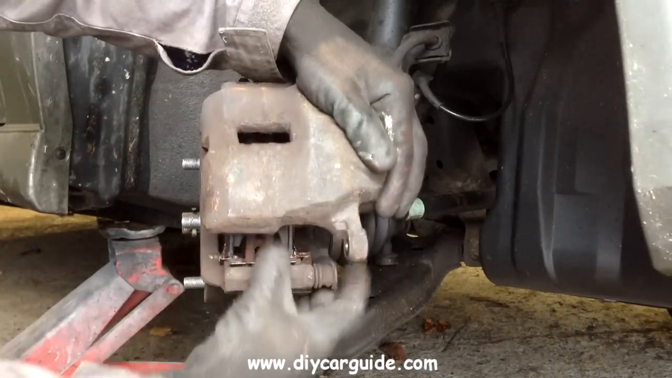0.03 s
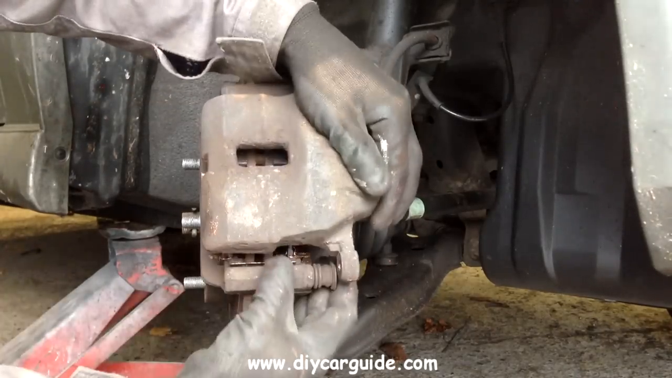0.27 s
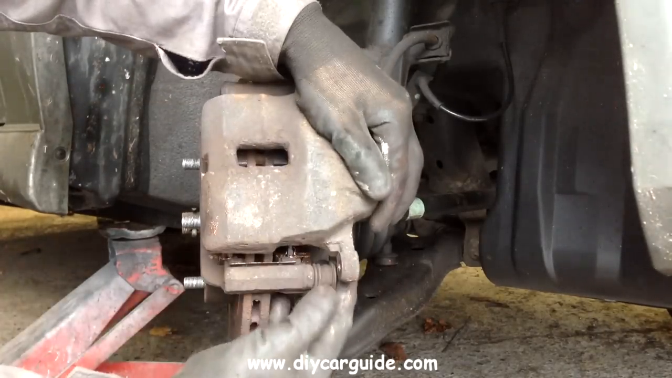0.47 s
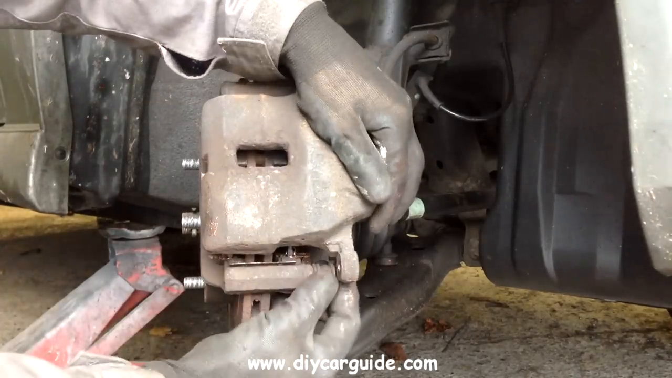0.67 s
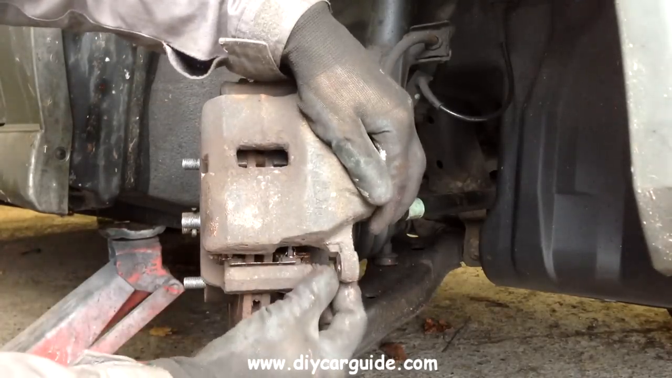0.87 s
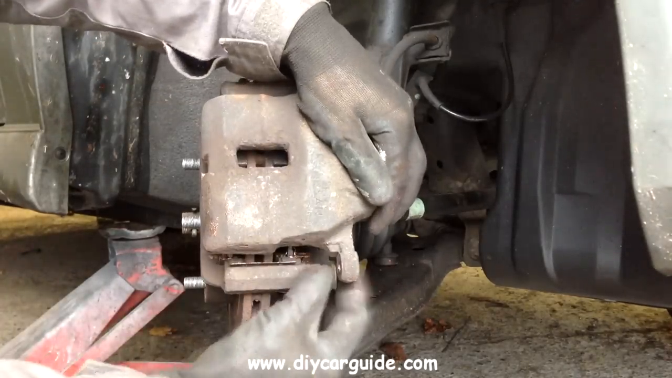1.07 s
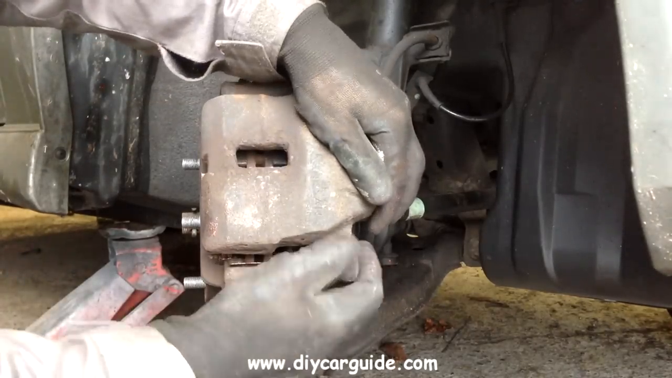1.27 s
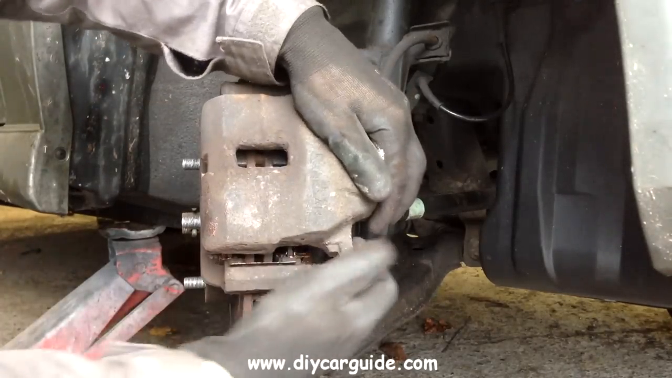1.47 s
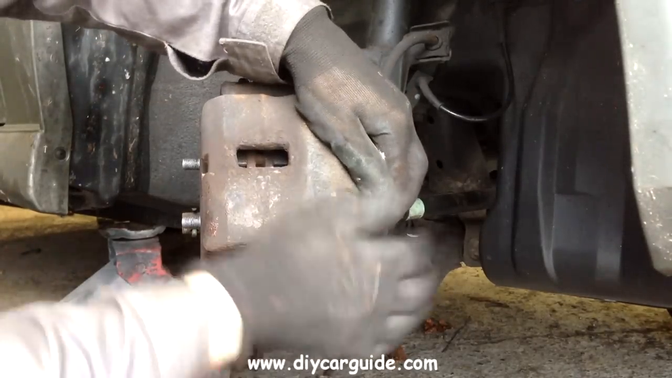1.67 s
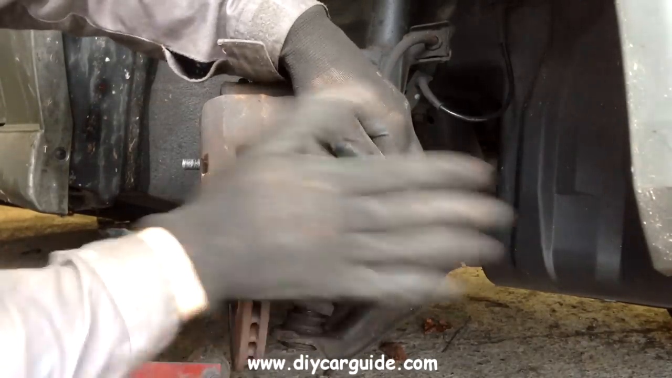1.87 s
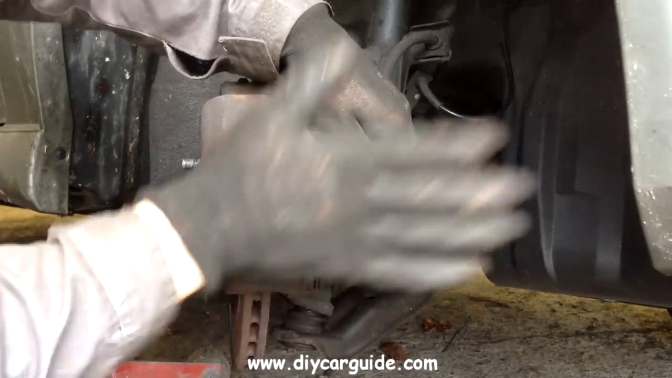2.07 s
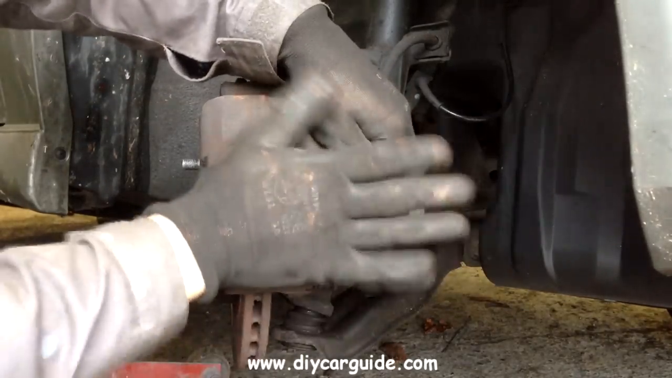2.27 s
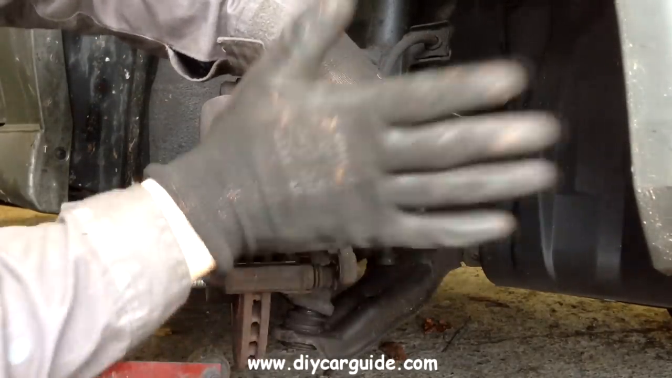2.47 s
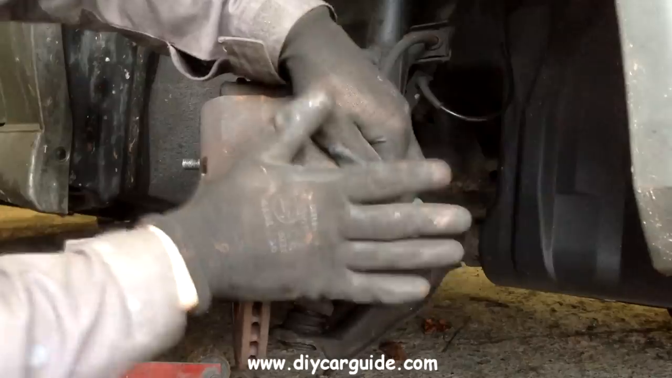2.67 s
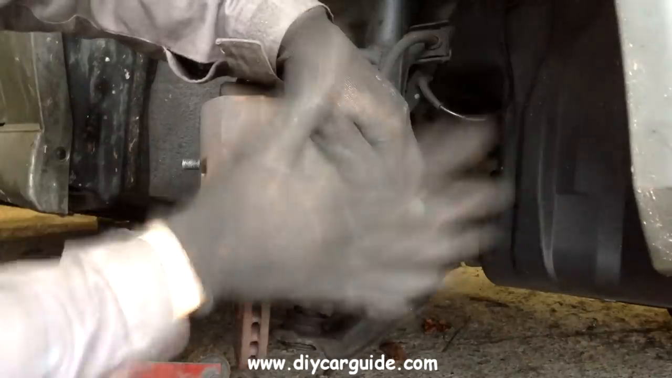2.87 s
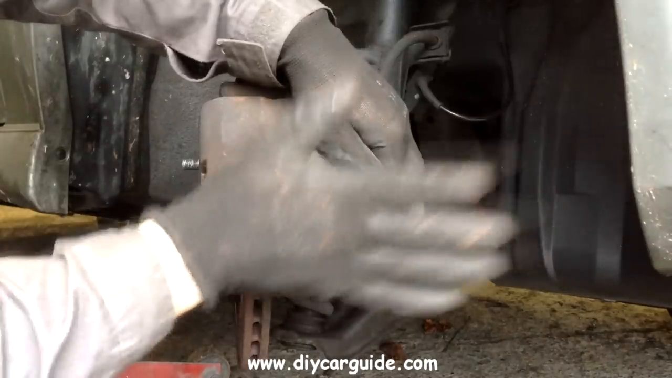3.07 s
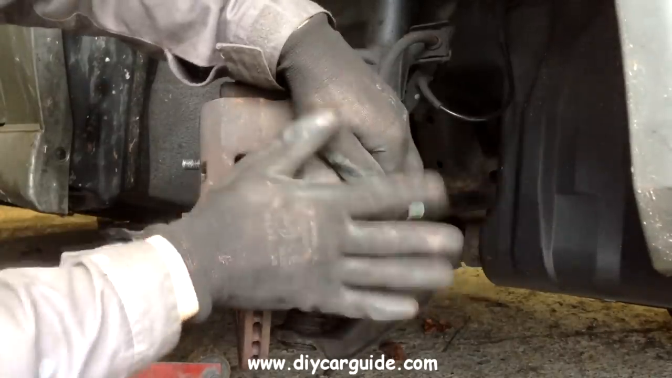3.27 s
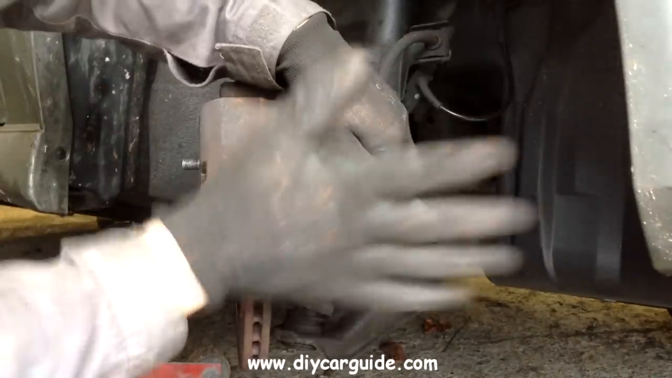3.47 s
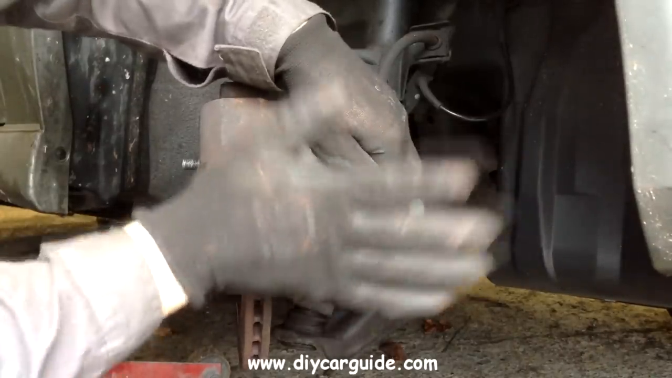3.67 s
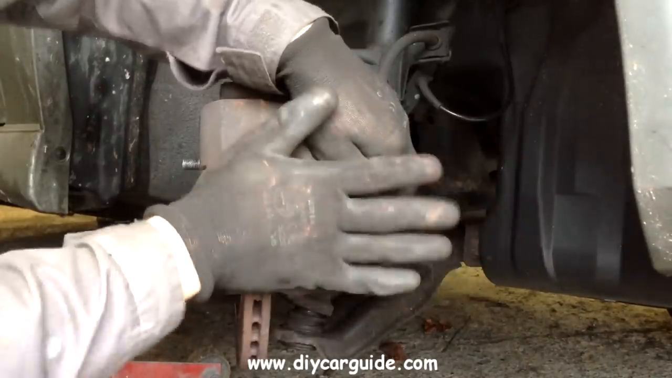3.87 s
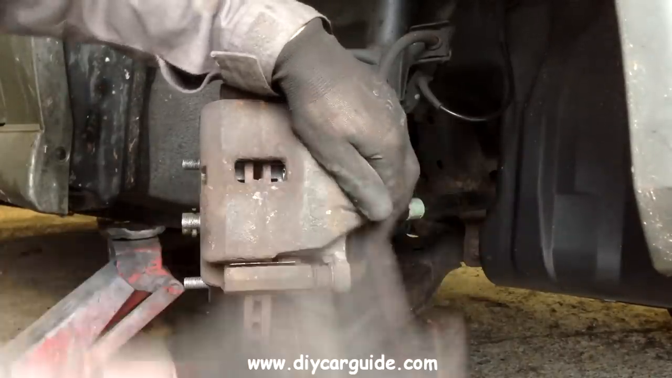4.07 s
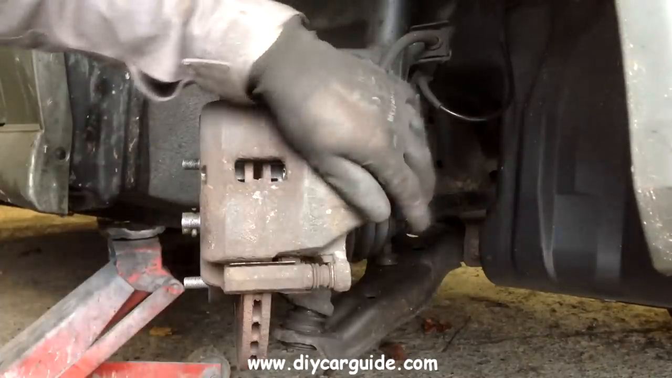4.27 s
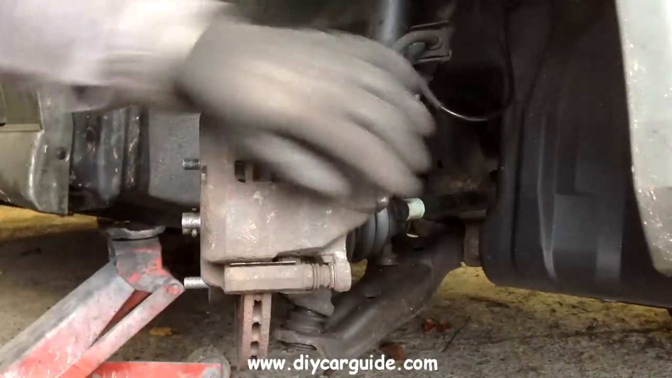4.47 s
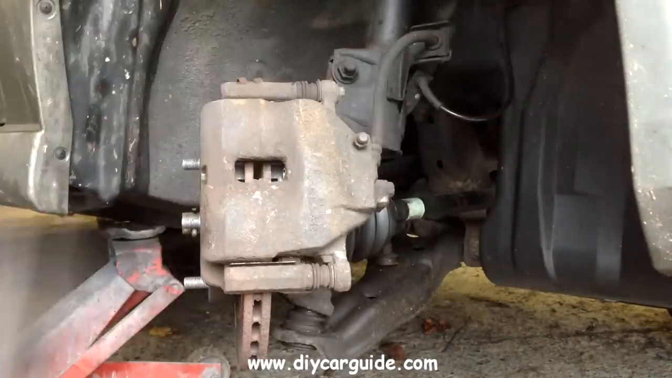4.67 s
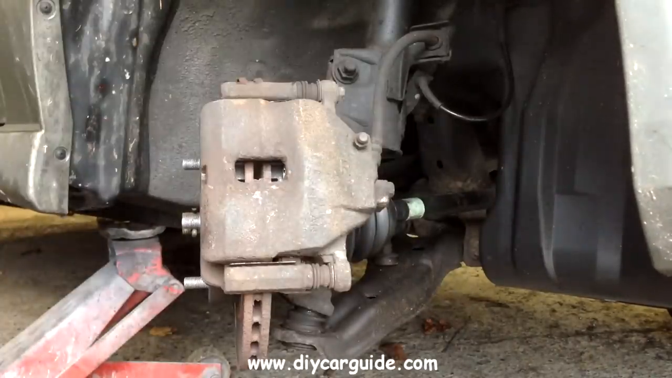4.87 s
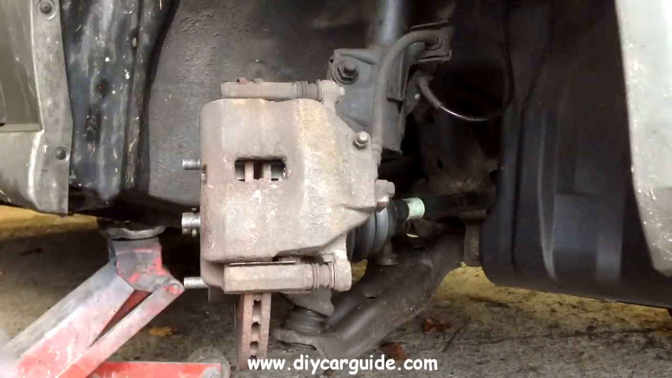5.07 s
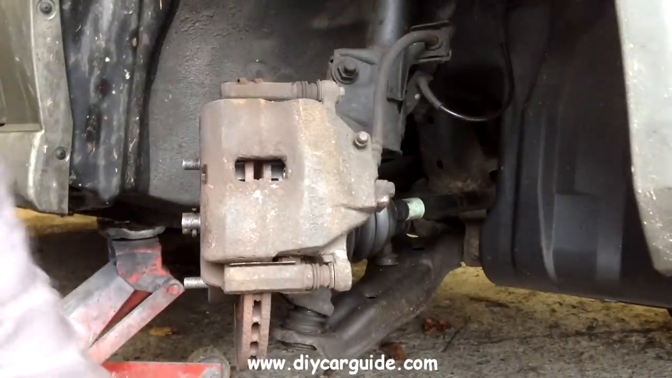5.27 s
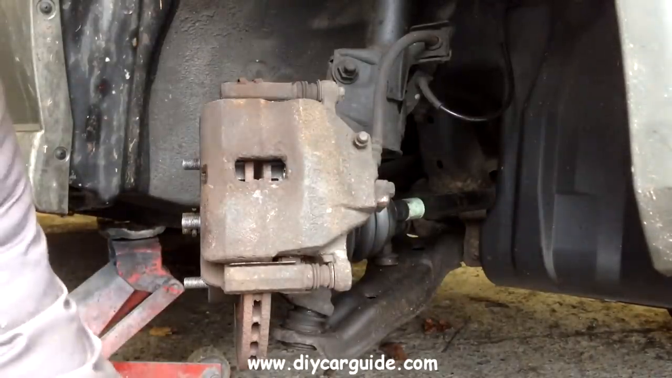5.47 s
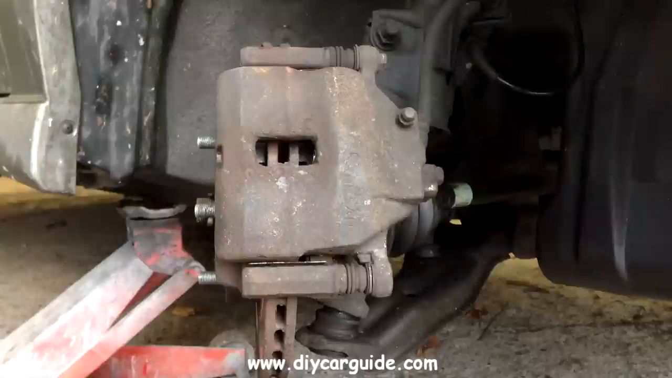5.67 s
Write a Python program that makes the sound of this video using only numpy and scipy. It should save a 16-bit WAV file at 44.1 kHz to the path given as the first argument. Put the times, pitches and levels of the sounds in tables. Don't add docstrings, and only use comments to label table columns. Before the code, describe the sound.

Over constant deep mains hum and soft hiss, a cast-iron part is slapped into place with seven hard, dull-ringing clacks.

```python
import sys
import numpy as np
from scipy import signal
from scipy.fft import rfft, irfft
from scipy.io import wavfile
from scipy.ndimage import uniform_filter1d

SR = 44100
rng = np.random.default_rng(int(sys.argv[2]) if len(sys.argv) > 2 else 0)


def bounce(signal):
    frames = np.transpose(np.atleast_2d(signal))
    limited = np.clip(frames, -1, 1)
    pcm = np.round(limited * 32767).astype(np.int16)
    wavfile.write(sys.argv[1], SR, pcm)


def invert_db(x):
    u = np.asarray(x, float) / 20
    return 10 ** u


N = 253134
LENGTH = 32768

# first touch t/s, tail level/dB, suspension thump level/dB, thump f/Hz
BLOWS = [
    (1.9774, -12, -29.5, 146),
    (2.315, -16.5, -19.5, 149),
    (2.657, -19, -18, 177),
    (2.959, -17, -20, 165),
    (3.288, -15, -25.5, 150),
    (3.5794, -17.5, -25.5, 142),
    (3.857, -12.5, -28.5, 167),
]
# level/dB, favoured f/Hz, free time before muting t/s
CASTING_RINGS = [
    (-40, 430, 0.102),
    (-34, 420, .15),
    (-30, 530, 0.2),
    (-28, 630, 0.11),
    (-24, 700, 0.18),
    (-28.5, 680, 0.12),
    (-25, 980, 0.27),
]
# level/dB, loosest spring f/Hz
PAD_SPRINGS = [
    (-50, 2900),
    (-46, 3400),
    (-35, 3340),
    (-27, 3340),
    (-42, 4100),
    (-40, 2320),
    (-30, 2600),
]
# f/Hz, t60/s
MODES = [(420, 0.41), (565, 0.27), (765, 0.29), (880, 0.089), (1160, 0.1), (1450, 0.15), (2320, .2),
         (2635, 0.39), (3340, 0.42), (4000, 0.094)]
# t/s, level/dB, centre f/Hz, fall/ms
SCRAPES = [(1.976, -34.5, 3000, 12.5), (2.315, -27, 3000, 7), (2.318, -22, 5260, 7.3),
           (2.6587, -21, 4200, 2.2), (2.6613, -15.5, 2550, 6.8), (2.674, -27, 2800, 6.4),
           (2.961, -17, 3000, 11), (2.973, -14.5, 1900, 6.2), (3.299, -29, 2720, 7.2),
           (3.5795, -35, 3000, 2.2), (3.585, -17.5, 1800, 2.2), (3.589, -16.5, 2400, 2.8),
           (3.855, -29, 4000, 5.4), (3.867, -19, 3100, 7)]
# t/s, level/dB, centre f/Hz, width/octaves, fall/ms
CLACKS = [(2.014, -37.5, 1830, 0.53, 5.9), (2.326, -15, 3300, 0.53, 3.8), (2.67, -11.5, 2200, 0.67, 2.5),
          (2.968, -12.5, 4200, 0.22, 1.8), (3.288, -18, 5960, 1.01, 2.3), (3.289, -13, 1300, 1.36, 3),
          (3.5822, -13, 1750, 0.58, 1.2), (3.582, -22, 6870, 0.38, 1.2), (3.8596, -4, 1520, 0.78, 0.98),
          (3.862, -27, 8000, 2.8, 2.2), (3.863, -15.5, 1510, 0.07, 1.4), (3.882, -29, 790, 0.33, 5.1)]
# t/s, level/dB, centre f/Hz, fall/ms
SEATS = [(1.991, -27, 405, 9.2), (2.330, -19.5, 656, 14.8), (2.675, -18.5, 836, 14),
         (2.978, -20, 678, 17.6), (3.299, -16, 685, 12.2), (3.595, -20, 600, 11.2), (3.875, -18.5, 800, 12),
         (3.878, -22.5, 404, 7.5)]
# f/Hz, t60/s
REVERBERATION = [(250, 0.5), (500, 0.74), (1000, 0.2), (2000, 0.37), (4000, 0.23), (8000, 0.058),
                 (14000, 0.18)]
# t/s, level/dB, tail level/dB
SNAPS = [
    (0.0656, -20.5, -22),
    (.1397, -13.5, -22.5),
    (1.0009, -29, -23),
    (4.396, -57, -20),
    (5.161, -52, -7),
]
# f/Hz, level/dB, width/octaves, fall/ms
SNAP_PARTS = [
    [(5950, 2.5, 0.91, 1.7), (3300, -3.5, 0.15, 3.8), (7800, -7, 0.12, 4), (5600, -13, 0.061, 5)],
    [(2800, 0.5, 0.38, 1.55), (4880, -3, 0.15, 1.8), (8000, -2.5, 0.43, 2.66), (2130, -10, 0.26, 8.3)],
    [(900, 0, 0.83, 0.83), (3800, -13.5, 0.12, 0.98)],
    [(1200, 3, 0.74, 4.1)],
    [(3500, -1.5, 0.57, 11), (202, 2, 0.19, 38)],
]
# loudest t/s, level/dB, swell/s, fade/s (20 dB each)
GLOVE = [
    (.88, -65, 0.2, .2),
    (2.55, -66, .3, 0.25),
    (3.82, -60.5, 0.16, 0.13),
    (4.1, -60, 0.9, 0.41),
    (4.445, -67, 0.033, .03),
]
# multiple, level/dB
HUM = [(1, -25.5), (3, -57.5), (5, -63.5), (7, -66), (9, -65.5), (11, -72), (15, -70)]
# from t/s, to t/s, swell/s, lift/dB
WHINE_NEAR = (.7, 4.25, .35, 7.9)
# f/Hz, density level/dB per Hz
HISS = [(40, -32), (80, 2), (115, 0), (160, -4.5), (220, -7), (330, -7), (550, -12.5), (1000, -13),
        (2000, -18), (4000, -23), (7500, -26.5), (12000, -27.5), (15250, -25.5), (15400, -46)]
# t/s, effort level/dB
EFFORT = [(0, 2), (.4, -3), (1.5, -1), (2.1, 0.5), (3.0, 2), (3.45, 0), (3.9, 4), (4.3, 0), (5.0, 1),
          (5.74, 1)]

SCRAPE_OCTAVES, SCRAPE_RISE_MS = 1.065, 1.2
CLACK_RISE_SHARE = 1
SEAT_OCTAVES, SEAT_RISE_SHARE = 0.97, 0.87
SPRINGS_FROM_HZ, CASTING_DB_PER_OCTAVE, SPRING_DB_PER_OCTAVE = 2000, 9, 50
MUTED_T60_S, THUMP_T60_S = 0.19, 0.45
TAIL_STRETCH, STRETCH_PER_DB, USUAL_THUMP_DB = 0.97, 0.04, -20.5
SNAP_RISE_MS = 0.14
GLOVE_HZ, GLOVE_OCTAVES = 3390, 0.04
MAINS_HZ = 50.066
WHINE_LOW_HZ, WHINE_HIGH_HZ, WHINE_LINES, WHINE_OCTAVES = 13040, 15200, 14, 0.005
WHINE_DB, WHINE_DB_PER_KHZ = -79.5, 7
HISS_DB, RUMBLE_HZ, AIR_HZ = -47, 128, 3000.0
RUMBLE_SHARE, AIR_SHARE, HISS_SHARE = 2.02, 1, 0.49
SWAY_DB, SWAY_T60_S = 35, 0.88


def knocks():
    out = np.zeros(N)
    for blow, ring, spring in zip(BLOWS, CASTING_RINGS, PAD_SPRINGS):
        s, tail_db, thump_db, thump_hz = blow
        ring_level, ring_hz, free_s = ring
        start = s - 2 * SCRAPE_RISE_MS / 1000
        direct, pushes = contacts(blow_rows(s), start)
        stretch = TAIL_STRETCH + STRETCH_PER_DB * (thump_db - USUAL_THUMP_DB)
        iron = casting(direct, ring_db(ring_level, ring_hz, *spring), free_s)
        suspension = invert_db(thump_db) * thump(thump_hz, THUMP_T60_S)
        reverberant = invert_db(tail_db) * tail(pushes, stretch)
        add(out, direct + reverberant + iron + suspension, start)
    return out


def blow_rows(s):
    rows = [(at, db, hz, SCRAPE_OCTAVES, SCRAPE_RISE_MS, ms) for at, db, hz, ms in SCRAPES]
    rows += [(at, db, hz, octaves, CLACK_RISE_SHARE * ms, ms) for at, db, hz, octaves, ms in CLACKS]
    rows += [(at, db, hz, SEAT_OCTAVES, SEAT_RISE_SHARE * ms, ms) for at, db, hz, ms in SEATS]
    return [row for row in rows if -0.01 < row[0] - s < 0.1]


def contacts(rows, start, grit_db=1.5):
    t, out, pushes = start + np.arange(LENGTH) / SR, 0, 0
    for s, db, hz, octaves, rise_ms, fall_ms in rows:
        shape = np.exp(np.minimum((t - s) * 1000 / rise_ms, (s - t) * 1000 / fall_ms))
        shape *= np.clip((t - start) * 1000, 0, 1)
        grit = invert_db(grit_db * np.repeat(rng.standard_normal(LENGTH // 32), 32))
        rough = shape * grit * band(LENGTH, hz, octaves)
        burst = irfft(rfft(rough) * bell(LENGTH, hz, 2 * octaves))
        push = np.roll(irfft(bell(LENGTH, hz, octaves)), int((s - start) * SR))
        push = push * (t < s + 0.1)
        size = invert_db(db) * np.linalg.norm(shape)
        burst = size * burst / np.linalg.norm(burst)
        push = size * push / np.linalg.norm(push)
        crack = np.exp(-(fall_ms / 2) ** 2)
        out = out + np.sqrt(crack) * push + np.sqrt(1 - crack) * burst
        pushes = pushes + push
    return out, pushes


def casting(x, gains_db, free_s, rough_db=3.2):
    t, out = np.arange(LENGTH) / SR, 0
    for (hz, t60), db in zip(MODES, gains_db):
        mode = np.sin(2 * np.pi * hz * t)
        twin = 0.25 * np.sin(2 * np.pi * 1.007 * hz * t)
        ring = signal.fftconvolve(x, (mode + twin) * fade(t, t60))[:LENGTH]
        out = out + invert_db(db + rough_db * walk(84.0, count=LENGTH)) * ring / np.abs(ring).max()
    return out * fade(np.maximum(t - free_s, 0), MUTED_T60_S)


def ring_db(casting_db, casting_hz, spring_db, spring_hz):
    hz = np.transpose(MODES)[0]
    iron_db = casting_db - CASTING_DB_PER_OCTAVE * np.abs(np.log2(hz / casting_hz))
    springs_db = spring_db - SPRING_DB_PER_OCTAVE * np.abs(np.log2(hz / spring_hz))
    return np.where(hz < SPRINGS_FROM_HZ, iron_db, springs_db)


def thump(hz, t60):
    t = np.arange(LENGTH) / SR
    swell = 1 - np.exp(-(t / 0.0097) ** 2)
    return band(LENGTH, hz, 0.54) * swell * fade(t, t60)


def tail(x, stretch=1):
    t, answer = np.arange(LENGTH) / SR, 0
    for hz, t60 in REVERBERATION:
        answer = answer + np.sqrt(hz / t60) * band(LENGTH, hz, 0.77) * fade(t, stretch * t60)
    answer *= 1 - np.exp(-t / 0.002)
    return signal.fftconvolve(x, answer / np.sqrt(np.sum(answer ** 2) / 4))[:LENGTH]


def snaps():
    out = np.zeros(N)
    for (s, db, tail_db), parts in zip(SNAPS, SNAP_PARTS):
        rows = [(s, db + part_db, hz, octaves, SNAP_RISE_MS, ms) for hz, part_db, octaves, ms in parts]
        start = s - 0.003
        direct, pushes = contacts(rows, start)
        add(out, direct + invert_db(tail_db) * tail(pushes), start)
    return out


def glove():
    t, gain = np.arange(N) / SR, 0
    for s, db, swell, fall in GLOVE:
        gain = gain + invert_db(db + 20 * np.minimum((t - s) / swell, (s - t) / fall))
    return gain * invert_db(2 * walk(70)) * band(N, GLOVE_HZ, GLOVE_OCTAVES)


def hum():
    turn, out = 2 * np.pi * MAINS_HZ * np.arange(N) / SR, 0
    for k, db in HUM:
        waver_db = min(k - 1, 2) * 0.8 * walk(5.11)
        out = out + np.sqrt(2) * invert_db(db + waver_db) * np.cos(k * turn)
    return out


def whine():
    t, out = np.arange(N) / SR, 0
    start, end, swell, lift_db = WHINE_NEAR
    near = np.clip(np.minimum(t - start, 3 * (end - t)) / swell + 0.5, 0, 1)
    lines = np.linspace(WHINE_LOW_HZ, WHINE_HIGH_HZ, num=WHINE_LINES)
    for hz in lines + 40 * rng.standard_normal(WHINE_LINES):
        db = WHINE_DB_PER_KHZ * (hz - WHINE_HIGH_HZ) / 1000
        out = out + invert_db(db + 2.5 * walk(4)) * band(N, hz, WHINE_OCTAVES)
    return invert_db(WHINE_DB + lift_db * near) * out


def hiss():
    hz, db = np.transpose(HISS)
    f, t = np.arange(1, N // 2 + 2) * SR / N, np.arange(N) / SR
    gain = invert_db(np.interp(np.log(f), np.log(hz), db, left=-40))
    low = 1 / (1 + (f / RUMBLE_HZ) ** 4)
    mid = 1 / (1 + (f / AIR_HZ) ** 2)
    effort_db = np.interp(t, *np.transpose(EFFORT))
    sway = 1
    for s, _, thump_db, _ in BLOWS:
        sway = sway + invert_db(SWAY_DB + thump_db) * fade(np.abs(t - s), SWAY_T60_S) * (t > s)
    rumble = low, sway * invert_db(RUMBLE_SHARE * effort_db)
    air = (1 - low) * mid, invert_db(AIR_SHARE * effort_db)
    preamplifier = 1 - mid, invert_db(HISS_SHARE * effort_db)
    out = 0
    for share, drift in (rumble, air, preamplifier):
        out = out + irfft(rfft(rng.standard_normal(N)) * gain * np.sqrt(share), N) * drift
    return invert_db(HISS_DB) * out / out.std()


def band(count, hz, octaves):
    x = irfft(rfft(rng.standard_normal(count)) * bell(count, hz, octaves), count)
    return x / x.std()


def bell(count, hz, octaves):
    f = np.arange(1, count // 2 + 2) * SR / count
    return np.exp(-0.5 * (np.log2(f / hz) / octaves) ** 2)


def fade(t, t60):
    return np.exp(-np.log(1000) * t / t60)


def walk(rate, count=N):
    k = int(SR / rate)
    held = np.repeat(rng.standard_normal(count // k + 1), k)
    return np.sqrt(2) * uniform_filter1d(uniform_filter1d(held, k), k)[:count]


def add(out, x, s):
    i = int(s * SR)
    x = x[:len(x) * 3 // 4][:len(out) - i]
    out[i:i + len(x)] += x


def scene():
    dulling = signal.butter(2, 13000.0, fs=SR, output="sos")
    blows = signal.sosfilt(dulling, knocks() + snaps())
    return (blows + glove() + hum() + whine() + hiss())[None]


def top_cut(x):
    return signal.sosfilt(signal.butter(12, 16340, fs=SR, output="sos"), x)


def record(dry):
    top = signal.ellip(8, 0.2, 40, 15700, fs=SR, output="sos")
    rounded = dry / (1 + (dry / 0.85) ** 6) ** (1 / 6)
    return top_cut(signal.sosfilt(top, rounded))


dry = scene()
out = record(dry)
bounce(out)
```